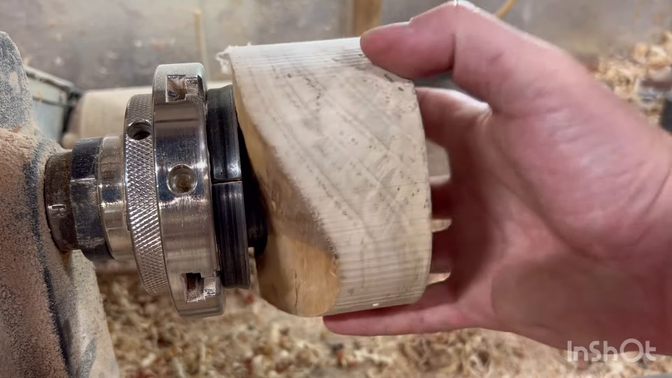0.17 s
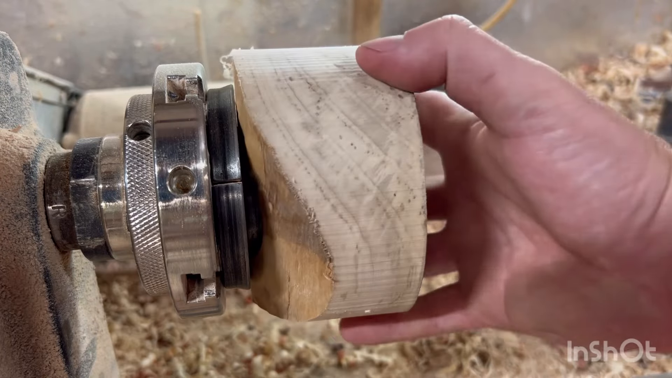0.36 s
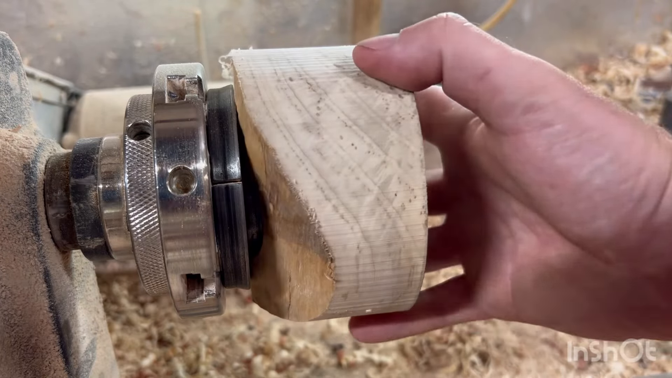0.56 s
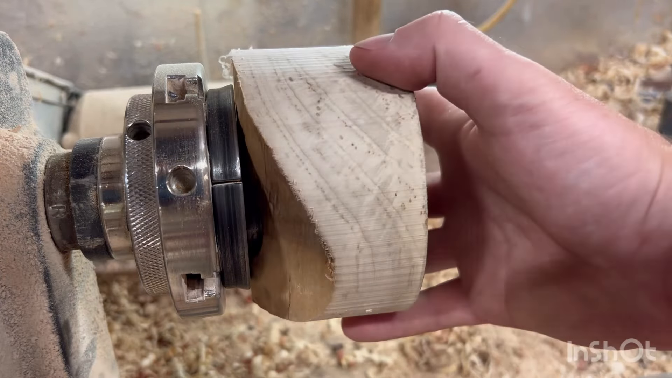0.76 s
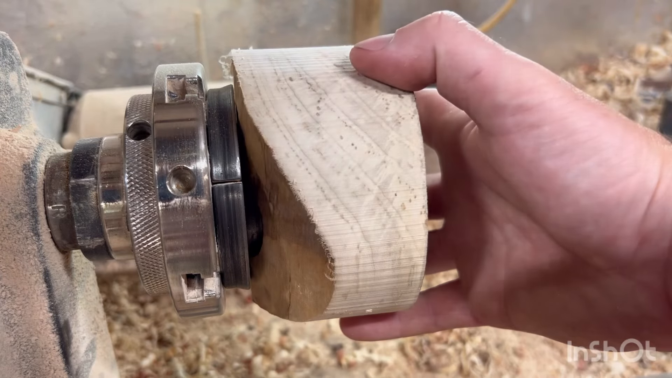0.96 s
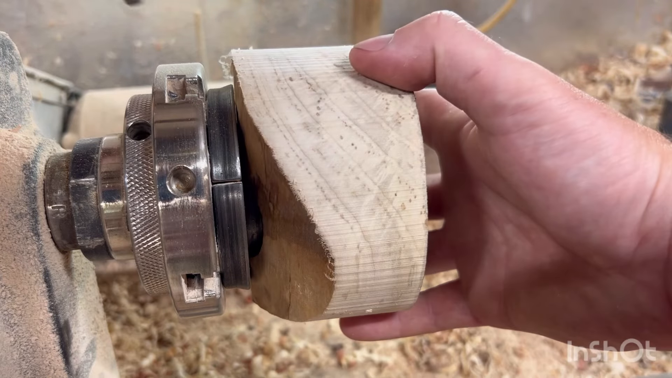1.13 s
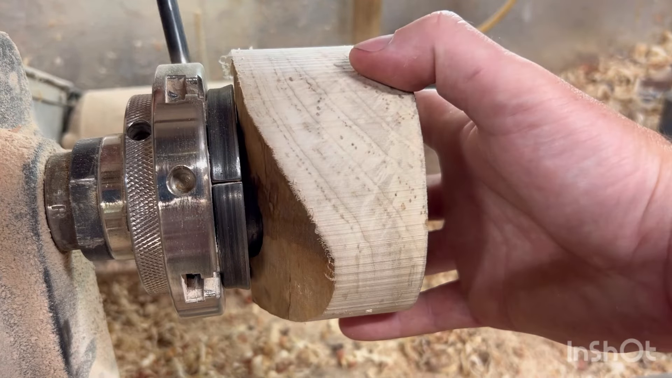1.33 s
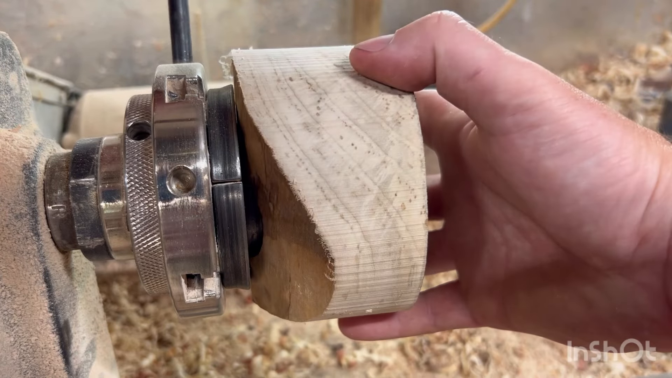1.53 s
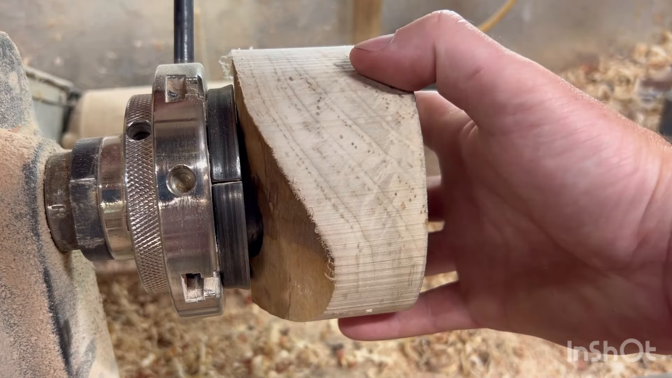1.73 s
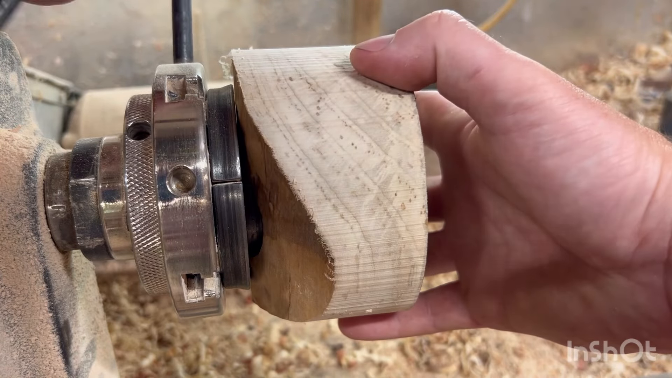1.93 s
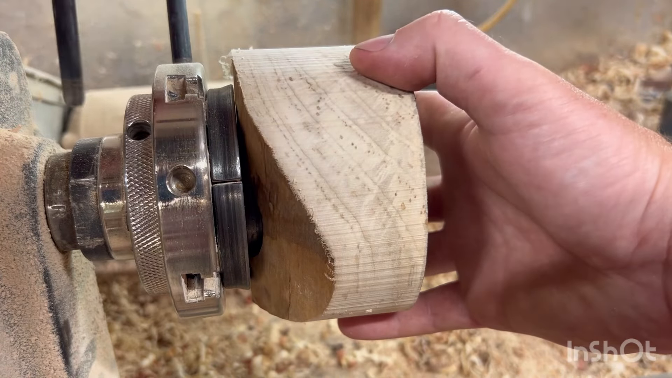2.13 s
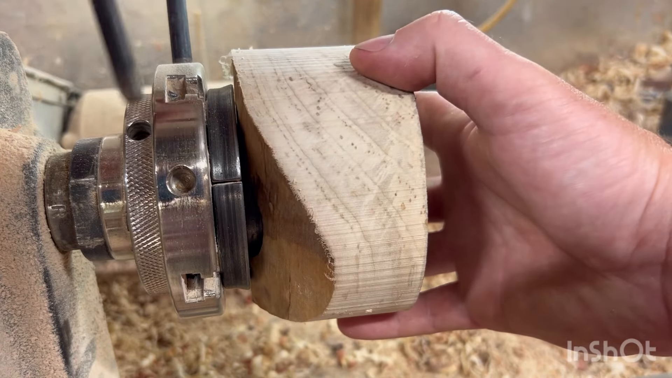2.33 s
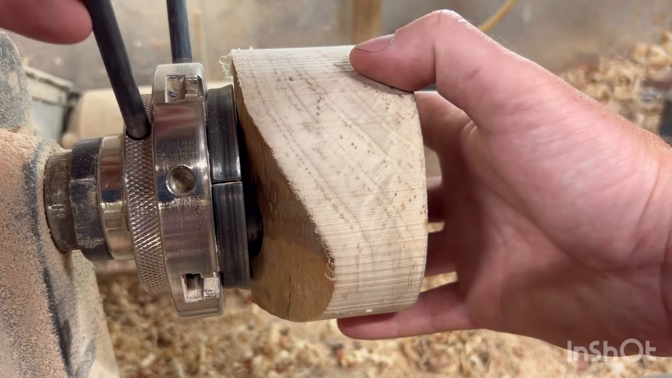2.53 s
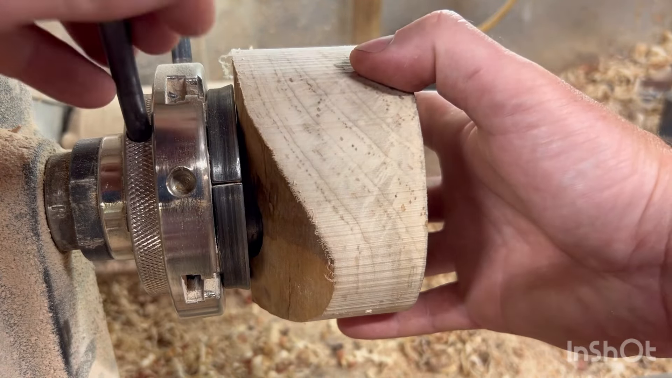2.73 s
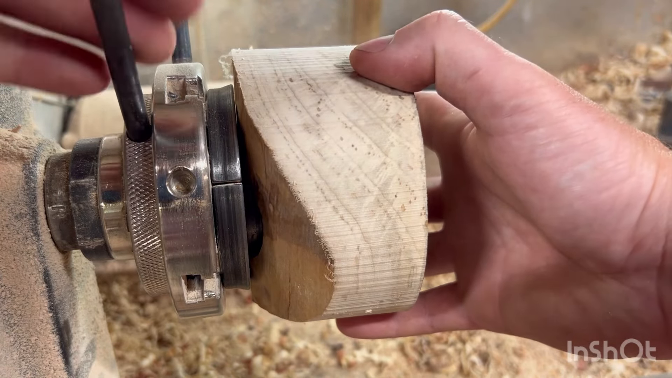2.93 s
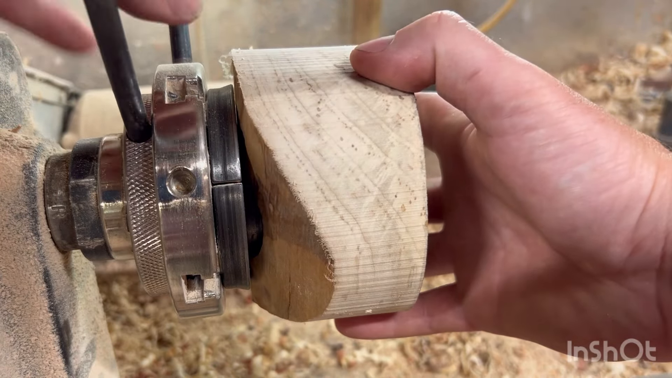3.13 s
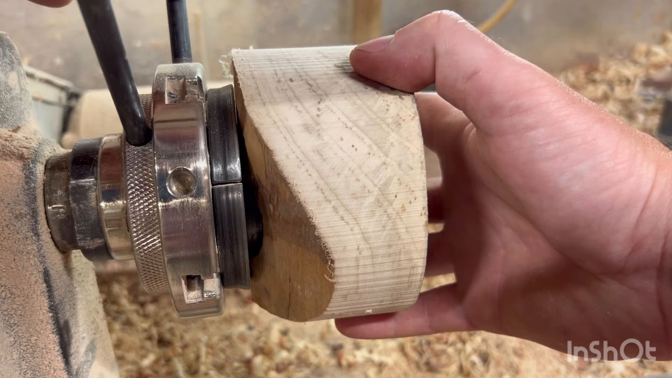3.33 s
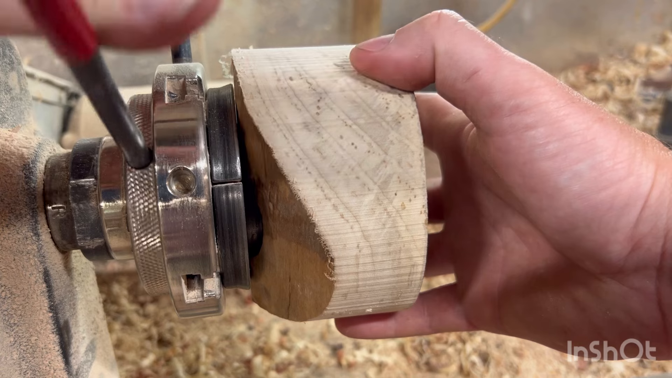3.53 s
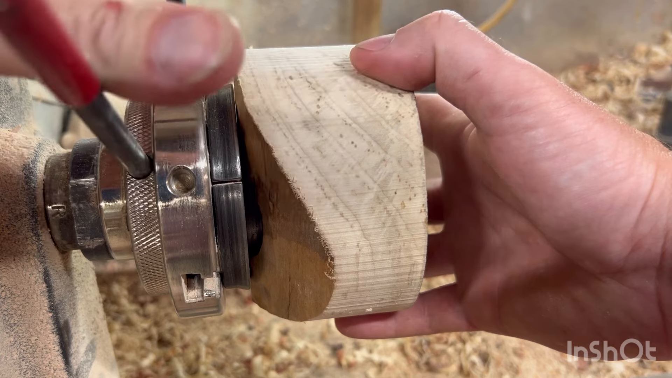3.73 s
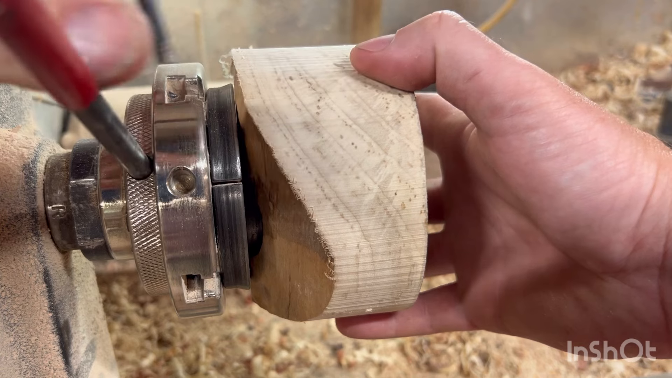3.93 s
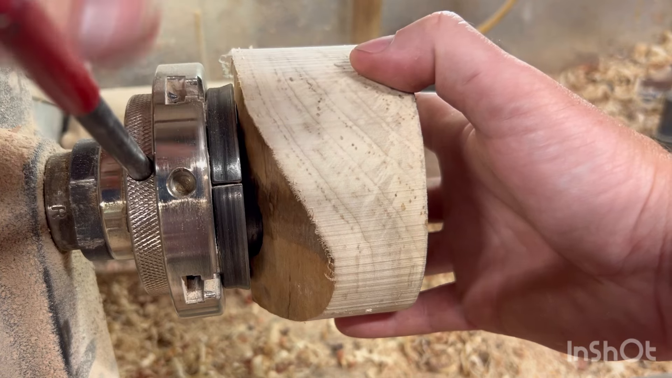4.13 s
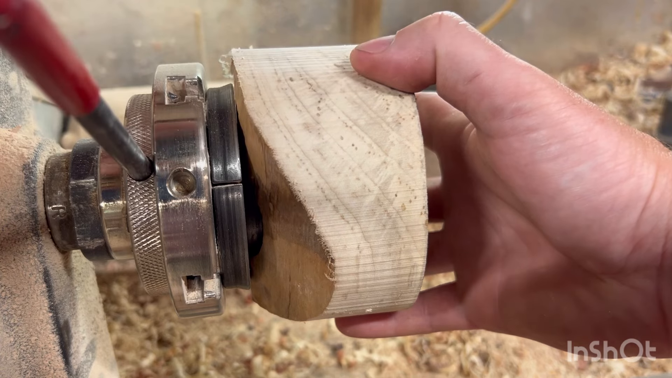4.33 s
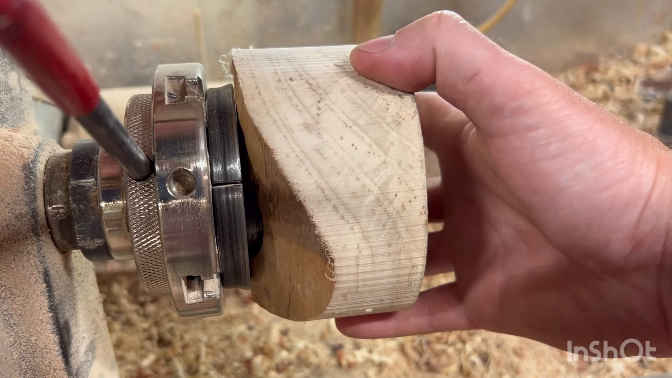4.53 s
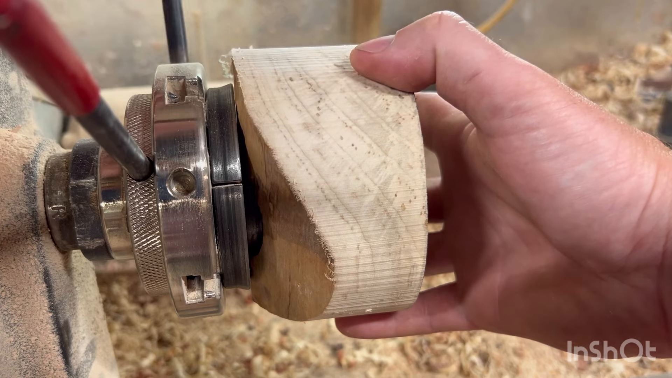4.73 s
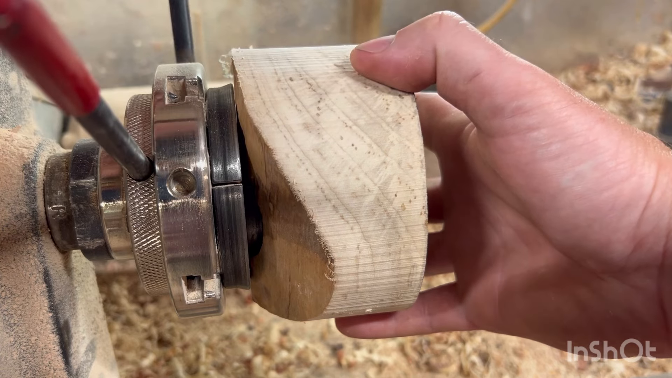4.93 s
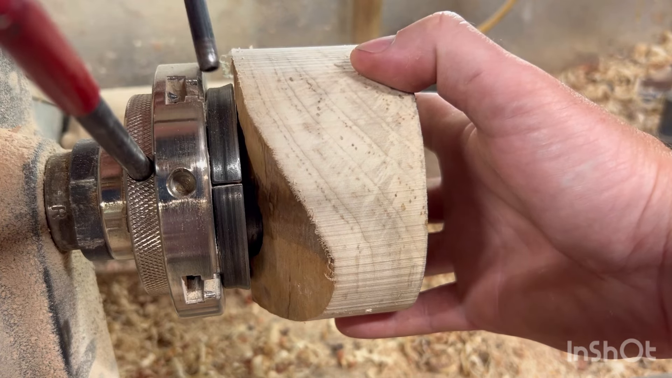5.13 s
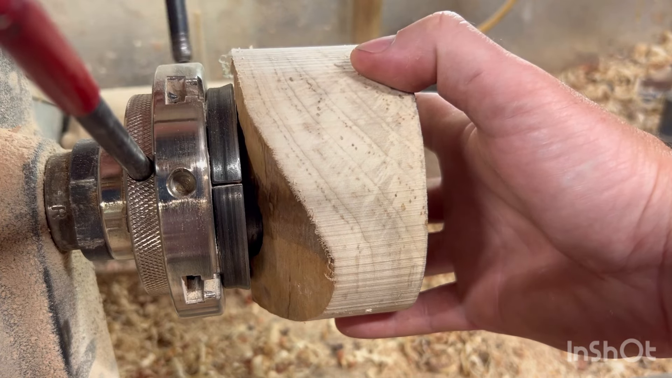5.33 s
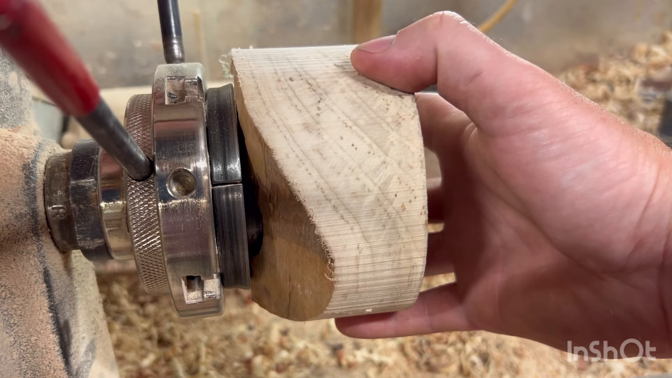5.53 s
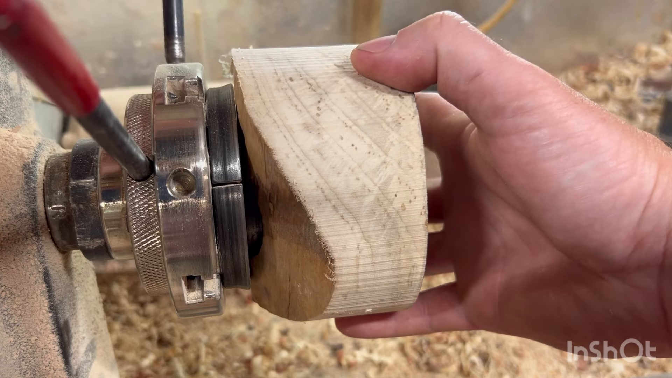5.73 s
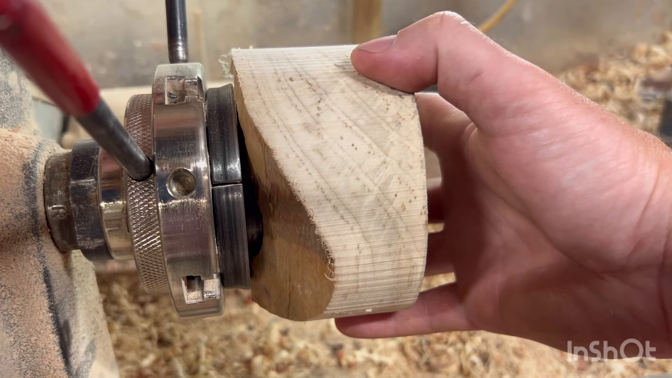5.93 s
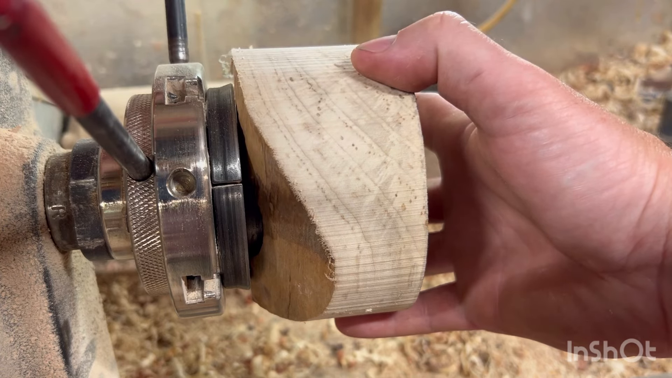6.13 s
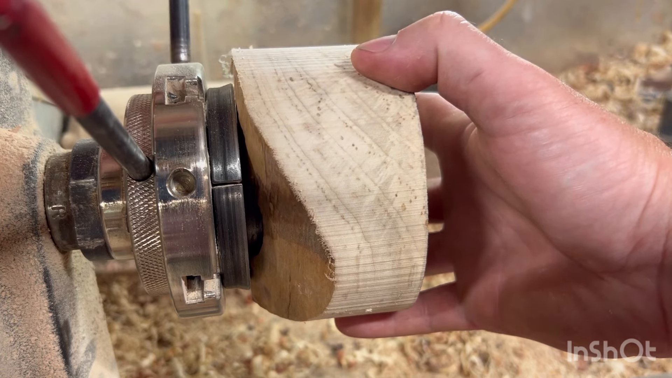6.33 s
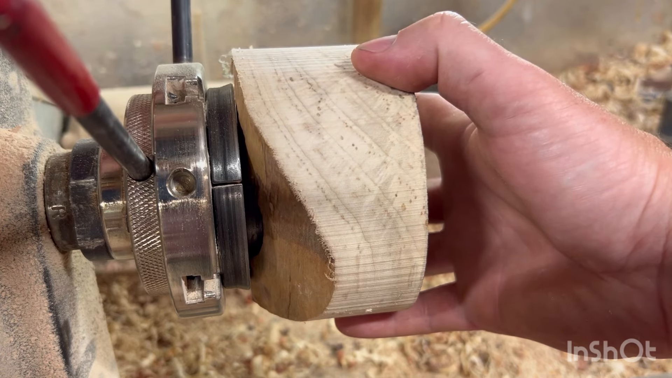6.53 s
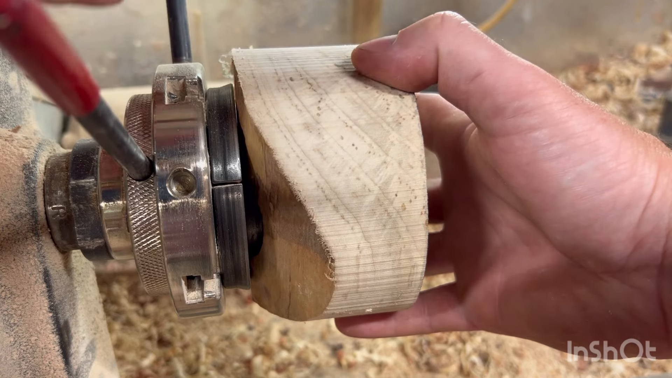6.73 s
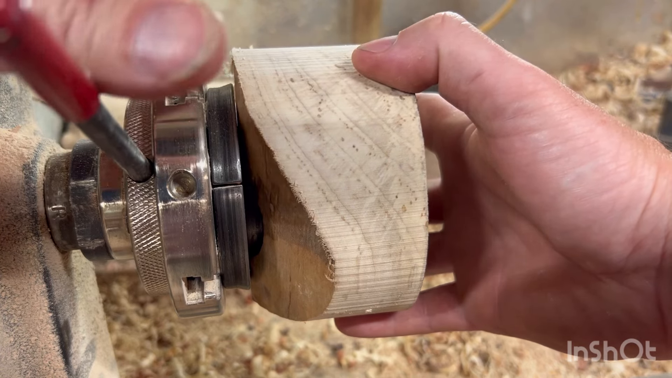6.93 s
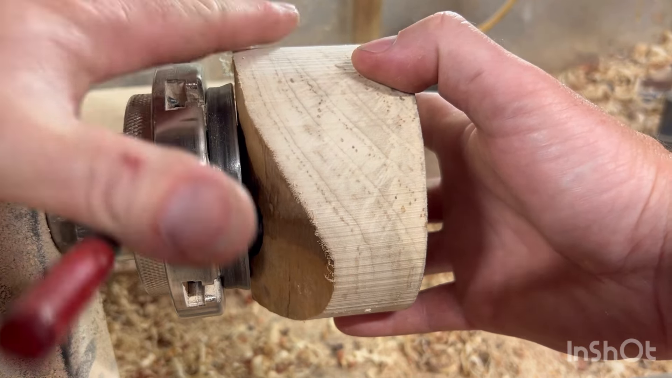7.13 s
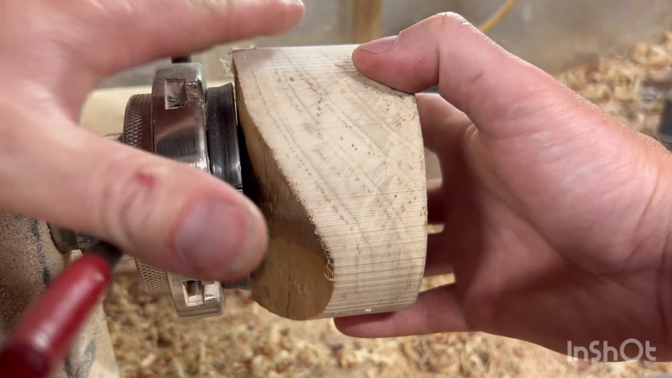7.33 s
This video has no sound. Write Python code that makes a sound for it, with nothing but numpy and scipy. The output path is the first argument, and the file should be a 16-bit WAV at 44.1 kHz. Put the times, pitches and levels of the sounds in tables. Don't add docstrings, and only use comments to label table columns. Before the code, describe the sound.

A close, dry stereo view of a small workshop, with a very quiet low hum and a far drone swelling slightly around 1.2 to 2 seconds. At the start a wooden blank slides on steel; at 0.1 and 0.16 it hits the chuck with two loud, short woody knocks and low thuds, then settles with a soft rap at 0.3. Around 1.33 to 1.4 a steel bar taps rapidly at a hole. At 1.93 it gives a small free ring. Clicks at 2.44 and 2.53 seat and jam it, and a hard bright clack at 2.68 drives it home. A dull nudge comes at 3.28. Near 3.9 there is a light scrape and thin squeal; at 4.7 a poke with the strongest high squeak, then fainter pokes and squeaks until 5.4. At 6.35 to 6.45 the bar slips in with a crisp rattle, followed by barely audible nudges and soft rubbing near 7.

```python
import sys
import numpy as np
from scipy import signal
from scipy.fft import rfft, irfft, next_fast_len
from scipy.io import wavfile
from scipy.ndimage import uniform_filter1d

SR = 44100
rng = np.random.default_rng(int(sys.argv[2]) if len(sys.argv) > 2 else 0)


def int16_out(signal):
    q = np.round(np.clip(np.atleast_2d(signal).T, -1, 1) * 32767)
    wavfile.write(sys.argv[1], SR, q.astype(np.int16))


def volts_from_db(level):
    exponent = np.asarray(level, float) / 20
    return 10 ** exponent


N = 325899

# Hz, dB per Hz.
HUM = [(12, -49), (20, -13.5), (64, 13.5), (139, -30), (179, -15.5), (265, -20), (416, -22.5), (599, -22),
       (939, -5), (1600, -15.5), (2050, -23.5), (2580, -37.5), (4500, -41), (6350, -36.5), (7250, -50.5),
       (8500, -43), (13100, -54), (13550, -36), (14100, -57.5)]
# Hz, likeness from 0 to 1.
HUM_LIKENESS = [(60, 0.98), (200, 0.95), (550, 0.52), (1000, 1), (2000, 0.25), (4000, 0.12)]
# Hz, left minus right in dB.
HUM_LEAN = [(60, -0.5), (240, -0.5), (950, -3.5), (3770, -12.5), (15000, 7.5)]
HUM_DB, HUM_LEAD_S = -62, .00022
# peak, rise and fall in seconds, level in dB.
DRONE = [(1.2, 0.7, 0.42, -66), (1.55, 0.39, 0.34, -62.5), (2.1, 0.29, 0.39, -69), (4.5, 1.26, 0.5, -68)]
# peak, rise and fall in seconds, level in dB.
WHINE = [(5.65, 0.4, 0.43, -95.5)]
WHINE_HZ, SQUEAL_HZ = 6460, 4962

# Hz, time to die by 60 dB in seconds.
SHOP_T60 = [(100, 0.71), (500, 0.36), (2000, 0.27), (5000, 0.25), (15000, 0.35)]
# Hz, room against direct sound in dB.
SHOP_WET = [(100, 5), (500, -8.5), (2000, -12), (5000, -22), (15000, -34)]
# Hz, lead of the left in radians.
PORT_LEAD = [(60, 0.), (300, .8), (600, .4), (1200, 1.3), (2500, -.6), (4900, -1.7), (9500, -.4),
             (15500, -.9)]
# Hz, left minus right in dB.
PORT_LEAN = [(60, -0.5), (130, -1.5), (290, -3), (640, 0.5), (1410, -2.5), (3100, 0), (4950, -3),
             (6820, -1), (15000, 0)]
# Hz,
# level in dB.
NEAR_COLOUR = [(5500, -1.5), (6500, 1), (7150, -22), (7700, 1.5), (10300, -2.5), (11200, -12), (13000, -21),
               (14500, -11), (15300, -1.5), (16300, -6), (17200, -58.5)]

# peak, rise and fall in seconds, rumble dB, bump dB.
PUSHES = [(0, 0.0097, 0.19, -39.5, -39), (.115, 0.014, 0.2, -31.5, -41), (.15, 0.014, 0.081, -34, -32),
          (.175, 0.027, 0.33, -37.5, -33.5), (.306, 0.0031, 0.037, -29.5, -73),
          (.44, 0.33, 0.096, -65, -55), (2.66, 0.19, 0.02, -45.5, -67.5), (2.95, 0.18, 0.24, -68, -64.5),
          (3.17, 0.12, .1, -60, -51), (3.94, 0.029, 0.12, -69.5, -54), (4.14, 0.078, 0.11, -79.5, -58.5),
          (4.79, 0.23, 0.059, -56, -85), (5.09, 0.0065, 0.096, -51, -75), (6.38, 0.013, 0.13, -77, -54.5),
          (6.468, 0.051, 0.17, -50, -59.5), (6.7, 0.027, 0.068, -75, -57), (7.0, 0.074, 0.6, -66.5, -68)]
# peak, rise and fall in seconds, swish dB.
BRUSHES = [(0, 0.0093, 0.35, -83), (2.03, 0.18, .1, -80), (3.47, 0.055, 0.13, -85),
           (.116, 0.0035, 0.05, -61.5), (.18, 0.03, 0.37, -68), (.438, 0.06, 0.13, -64.5),
           (2.96, 0.06, 0.12, -82), (3.18, 0.15, 0.083, -84.5), (5.576, 0.099, 0.093, -87),
           (6.37, 0.012, 0.25, -68), (7.086, 0.14, 0.17, -76.5), (7.39, 0.22, 0.092, -90)]
# peak, rise and fall in seconds, level in dB.
RUBS = [
    (0, .01, 0.7, -61.5),
    (.2, 0.035, 0.35, -60),
    (1.333, 0.017, 0.0048, -61.5),
    (7.07, .1, 0.085, -81.5),
]
# Hz, dB per Hz.
SWISH = [(410, -43), (700, -25), (1100, -2), (2130, -6.5), (6600, -11.5), (7200, -32), (7800, -10.5),
         (11400, -13), (12200, -49), (13800, -40), (14800, -16), (16500, -43.5)]
# peak, rise and fall in seconds, scrape dB, bar singing dB.
STROKES = [(2.436, 0.0067, 0.011, -57.5, -84), (2.668, 0.024, 0.008, -45.5, -57.5),
           (3.886, 0.075, 0.039, -54, -66), (4.72, 0.015, 0.073, -50.5, -68.5), (4.9, 0.03, 0.2, -67, -77),
           (5.1, 0.017, 0.14, -64, -72), (5.178, 0.052, 0.043, -72, -70), (5.22, 0.013, 0.024, -67, -70),
           (6.362, 0.022, 0.014, -49, -69), (6.44, 0.11, 0.053, -64, -82.5)]
# Hz, dB per Hz.
SCRAPE = [(410, -39), (700, 13), (1490, -18), (3240, 4), (4400, -15), (5090, -2), (8080, -25.5),
          (9720, -4.5), (12000, -58), (15900, -24.5), (16500, -54.5)]
# Hz, level in dB, time to die by 60 dB in seconds.
SLIDE_TONES = [(9560, 0, .06), (15400, -4, .06)]
# peak, rise and fall in seconds, level in dB.
SQUEAL = [(3.895, 0.0089, 0.12, -51), (4.08, 0.071, 0.11, -67.5), (4.706, 0.0089, 0.087, -36.5),
          (4.82, 0.012, 0.02, -66), (4.9, 0.038, 0.049, -79), (5.0, 0.082, 0.18, -54.5),
          (5.085, 0.0052, 0.013, -51), (5.135, 0.023, 0.045, -58), (5.22, .15, 0.12, -71)]
SWING_DB = 30
# start in seconds, level in dB.
TICKS = [(1.337, -39), (1.3409, -42), (1.3513, -41), (1.3691, -40), (1.3771, -44), (3.8669, -54),
         (3.873, -55), (3.8776, -55), (3.8804, -50), (3.8849, -51), (3.8919, -45), (3.8999, -48),
         (4.7221, -54), (4.7261, -54), (4.7688, -59), (4.7826, -60), (4.8028, -60), (4.8054, -55),
         (4.8966, -65), (4.947, -65), (5.0875, -51), (5.1276, -58), (5.1317, -56), (5.1356, -58),
         (5.1617, -58), (5.1651, -56), (5.1728, -51), (5.1947, -60), (5.2209, -52), (6.3548, -30),
         (6.3574, -43), (6.3614, -42), (6.375, -45), (6.3967, -33), (6.3992, -46), (6.4023, -51),
         (6.408, -42), (6.4137, -45), (6.4169, -49), (6.4229, -50), (6.4285, -39), (6.4312, -45),
         (6.4344, -46), (6.4467, -40)]
TICK_HZ, TICK_T60_S, TICK_DB = 3270, .008, 2.5

# start in seconds, dB of crack, thud, low ring (5 kHz) and high (9.5 kHz).
BUMPS = [
    (0, -44, -44, -58, -70),
    (0.1116, -13, -25.5, -29, -21.5),
    (0.1142, -21.5, -38.5, -33, -35.5),
]
# start in seconds, then dB of crack, thud, low ring and high ring.
KNOCKS = [
    (0.1571, -8, -20.5, -26, -36),
    (0.1596, -20, -34.5, -28, -48),
    (0.2041, -38.5, -41, -44.5, -74.5),
]
# start in seconds, then dB of crack, thud, low ring and high ring.
NUDGES = [
    (0.3035, -24, -33.5, -44.5, -54),
    (3.2793, -34.5, -45, -61, -61.5),
    (6.4472, -45, -68, -58, -64),
    (6.9570, -66.5, -57.5, -78, -87),
    (7.0372, -61, -57, -78, -90),
]
# start in seconds, then dB of crack, thud, low ring and high ring.
TAPS = [(1.3342, -27, -39, -40, -31), (1.3432, -26, -39, -35, -48), (1.3480, -31, -42, -40, -39),
        (1.3688, -36, -43, -45, -54), (1.3735, -36, -43, -47, -48), (1.3775, -38, -50, -47, -54),
        (1.3938, -46, -44, -53, -55)]
# start in seconds, then dB of crack, thud, low ring and high ring.
DANGLE = [
    (1.9317, -29, -50, -50.5, -32),
]
# start in seconds, then dB of crack, thud, low ring and high ring.
SEATS = [
    (2.4372, -40, -60, -64, -55),
    (2.4405, -23.5, -41.5, -50.5, -48),
    (2.4425, -17.5, -40.5, -52, -35),
]
# start in seconds, then dB of crack, thud, low ring and high ring.
JAMS = [
    (2.5300, -27, -48.5, -43, -27),
    (2.5327, -28, -41.5, -41, -24),
    (2.5390, -36, -55, -43, -30.5),
]
# start in seconds, then dB of crack, thud, low ring and high ring.
HOME = [
    (2.6753, -17.5, -29.5, -33.5, -20.5),
    (2.6775, -32.5, -39, -33, -34.5),
]
# start in seconds, then dB of crack, thud, low ring and high ring.
PROBES = [(3.8881, -39.5, -50, -53.5, -53), (3.8974, -47, -54.5, -58, -64), (4.8046, -49, -48.5, -65, -72),
          (5.0789, -38, -48, -47, -45), (5.1275, -56, -53, -61, -63), (5.1728, -52.5, -58, -68, -70),
          (5.2209, -59, -63, -70, -68), (5.3613, -39.5, -45, -64.5, -70.5), (5.7700, -59.5, -55, -74, -81)]
# start in seconds, then dB of crack, thud, low ring and high ring.
POKES = [
    (4.6982, -29.5, -36.5, -55, -51),
    (4.9766, -33.5, -41.5, -54, -65),
]
# start in seconds, then dB of crack, thud, low ring and high ring.
SLIPS = [(6.3548, -36, -47.5, -52, -38), (6.3580, -60, -60, -56, -34), (6.3635, -58, -60, -56, -34.5),
         (6.3752, -54, -46, -56, -42), (6.3967, -40, -54, -60, -40), (6.4082, -50, -49.5, -58, -56),
         (6.4137, -60, -65, -60, -54), (6.4285, -46, -62, -58, -46), (6.4470, -42, -43, -56, -70)]

# Hz, dB per Hz.
WOOD = [(350, -22.5), (600, -4), (1150, -14.5), (1720, -12.5), (2370, -12.5), (4800, -13.5), (6890, -24.5),
        (7590, -15), (12900, -55), (15400, -35), (16500, -68.5)]
# Hz, dB per Hz.
DULL = [(350, -47), (600, -5.5), (1680, -7), (2450, -3.5), (3070, -18), (3400, -15.5), (4940, -14),
        (7090, -61), (9000, -47), (11700, -78), (19800, -120)]
# Hz, dB per Hz.
TOUCH = [(350, -39), (600, 1.5), (1290, -14.5), (1770, -8), (3490, -4.5), (4940, -4.5), (7180, -20.5),
         (9610, -9.5), (12300, 2), (15800, -18), (16500, -56)]
# Hz, dB per Hz.
STEEL = [(350, -26), (600, -7), (1580, -21.5), (2370, -11), (2680, -10), (5080, -1.5), (7180, -28.5),
         (9480, -19), (12700, -34.5), (15200, -21.5), (16500, -30.5)]
# Hz, dB per Hz.
HOLE = [(350, -33), (600, 8.5), (1360, -7), (3260, -1), (4420, -9.5), (5080, -18), (7490, -16), (9480, -22),
        (12500, -109), (15800, -25), (16500, -15)]
# Hz, dB per Hz.
THUD = [(35, -39.5), (60, -16.5), (101, -9.5), (232, -15), (314, -1), (377, -7), (530, -2.5), (802, -19.5),
        (862, -18), (1100, -20.5), (1430, -44), (2420, -120)]
# Hz, level in dB, time to die by 60 dB in seconds.
BODY = [(112, -9.5, 1.4), (192, -15.5, 0.04), (284, -6.5, 0.35), (323.1, 7.5, 0.57), (437, 5.5, 0.71),
        (520, -2, 0.53), (697.6, -29, 0.13), (687, -16.5, 0.5), (960, -25, 2.3)]
# Hz, dB against its ring column, time to die by 60 dB in seconds.
RIM = [(1266, 3.5, .018), (857, -1, 0.029), (2580, -2, .03), (3560, -3.5, .016), (4724, -3, .025),
       (7700, -9.5, 0.019), (7960, -14.5, 0.014), (9100, -6.5, .01), (15300, -23.5, 0.01)]
# Hz, dB against its ring column, time to die by 60 dB in seconds.
BLANK = [(1117, 6.5, .02), (824, -5.5, .025), (1960, -9, 0.03447), (2735, -11.5, .03), (3814, -6, 0.012),
         (4734, -12, .025), (7660, -10, 0.03), (9283, -13, 0.019)]
# Hz, dB against its ring column, time to die by 60 dB in seconds.
RAPPED = [(2360, -17, 0.0092), (1480, -9, 0.084), (756, -1.5, 0.048)]
# Hz, dB against its ring column, time to die by 60 dB in seconds.
DAMPED = [(1830, -5, 0.03), (4920, -1, 0.035), (4260, -4, 0.016), (9555, -8, 0.09), (15370, -14, .04),
          (3900, -8, 0.018)]
# Hz, dB against its ring column, time to die by 60 dB in seconds.
HANGING = [(1845, -2, .55), (5000, 5, .15), (9580, -3, .07), (15410, -18, .07), (2330, 0, .04),
           (2050, -1, .04)]
# Hz, dB against its ring column, time to die by 60 dB in seconds.
GRIPPED = [(2331, -6.5, 0.038), (4960, -2.5, 0.023), (9730, -10.5, 0.028), (15430, -9, 0.023),
           (8220, -7, .035)]
# Hz, dB against its ring column, time to die by 60 dB in seconds.
JAMMED = [(1800, -4, 0.02), (5180, -3, 0.05), (3750, -6, .015), (9572, 0, 0.046), (15400, -15, 0.045),
          (8118, -17, .035)]
# Hz, dB against its ring column, time to die by 60 dB in seconds.
LOCKED = [(533, -2, 0.039), (1015.4, -7.5, 0.051), (1421, -8, 0.054), (1870, 0, 0.034), (2270, -0.5, 0.045),
          (2425, -5.5, .03), (4280, -11.5, 0.019), (4860, -1, .03), (8000, -16.5, 0.031),
          (9623, 0.5, 0.015), (11400, -11.5, 0.014), (15400, 5, 0.016)]
# Hz, dB against its ring column, time to die by 60 dB in seconds.
LOOSE = [(1820, -9, .025), (2520, -18, 0.017), (4840, 3, 0.078), (9545, -2, 0.067), (15390, -22, 0.082),
         (3400, 5, 0.025)]
# Hz, dB against its ring column, time to die by 60 dB in seconds.
FLAT = [(1950, 0.5, 0.077), (2364, -13, 0.043), (2939, 6, 0.049), (4091, -3, .03), (6185, -9, 0.018),
        (9500, 1.5, 0.058), (15370, -2, 0.072)]
# Hz, dB against its ring column, time to die by 60 dB in seconds.
WEDGED = [(1795, -9.5, 0.04), (4940, -5, 0.03), (9550, 0, 0.05), (15400, -24, 0.06), (8440, -22, 0.03)]
# low Hz, high Hz, dB against the ring column,
# time to die by 60 dB in seconds.
WASH = [(4850, 5400, -21, .32), (1700, 2700, -22, .25), (7750, 8500, -36, .28), (8500, 9200, -43, .25),
        (9350, 9950, -34, .3), (15200, 15550, -44, .3)]


def evened(x):
    return x / np.sqrt(np.mean(x ** 2) + 1e-20)


def read(points, hz):
    f, value = np.transpose(points)
    return np.interp(np.log(hz + 1), np.log(f + 1), value)


def add(mix, s, sound):
    part = mix[round(s * SR):][:len(sound)]
    part += sound[:len(part)]


def coloured(x, points):
    hz = abs(np.fft.fftfreq(4096, 1 / SR))
    log_gain = np.log(volts_from_db(np.maximum(read(points, hz), -100)))
    taps = np.fft.ifft(np.exp(np.conj(signal.hilbert(log_gain)))).real[:1024]
    return signal.oaconvolve(x, taps / np.linalg.norm(taps))[:len(x)]


def band(x, low_hz, high_hz):
    sos = signal.butter(2, [low_hz, high_hz], "band", fs=SR, output="sos")
    return evened(signal.sosfilt(sos, x))


def ring(hz, db, t60, t, phase=0.):
    return volts_from_db(db - 60 * t / t60) * np.sin(2 * np.pi * hz * t + phase)


def resonate(x, hz, t60):
    r = np.exp(-np.log(1000) / (t60 * SR))
    return evened(signal.lfilter([1], [1, -2 * r * np.cos(2 * np.pi * hz / SR), r * r], x))


def gesture(rows, x, column=3, bend=1):
    t, gain = np.arange(0, N + 32, 32) / SR, 0
    for row in rows:
        peak, rise, fall = row[:3]
        away = np.where(t < peak, (peak - t) / rise, (t - peak) / fall)
        gain = gain + volts_from_db(row[column] - SWING_DB * np.minimum(away, 5) ** bend)
    return np.interp(np.arange(N) / SR, t, gain) * x


def hum():
    frames, hz = N // 256 + 5, np.fft.rfftfreq(1024, 1 / SR)
    a, b, c, d, patches = rng.standard_normal((frames, 513, 5)).T
    patches = evened(uniform_filter1d(uniform_filter1d(patches, 8, 0), 20, 1))
    same = np.clip(read(HUM_LIKENESS, hz), -1, 1)[:, None]
    left = a + 1j * b
    right = same * left + np.sqrt(1 - same ** 2) * (c + 1j * d)
    z = np.array([left, right])
    z[0] *= np.exp(2j * np.pi * hz * HUM_LEAD_S)[:, None]
    lean = np.array([.5, -.5])[:, None, None] * read(HUM_LEAN, hz)[:, None]
    z *= volts_from_db(read(HUM, hz)[:, None] + lean + 1.6 * patches)
    return volts_from_db(HUM_DB) * evened(signal.istft(z, nperseg=1024, noverlap=768)[1][:, :N])


def far():
    shared, left, right = rng.standard_normal((3, N))
    drone = np.array([band(shared + 2.0 * own, 150.0, 440) for own in (left, right)])
    whine = resonate(shared, WHINE_HZ, 0.45)
    return gesture(DRONE, drone, bend=1.8) + gesture(WHINE, whine, bend=5.4)


def shop(x):
    taps = np.zeros((3, SR))
    at = np.arange(200, SR - 20, 20) + rng.integers(0, 20, (3, (SR - 201) // 20))
    np.put_along_axis(taps, at, rng.choice([-1., 1.], at.shape), 1)
    taps = taps[0] + 0.58 * taps[1:]
    hz, t, z = signal.stft(taps, SR, nperseg=512)
    t60 = read(SHOP_T60, hz)[:, None]
    fade = volts_from_db(read(SHOP_WET, hz)[:, None] - 60 * t / t60) / np.sqrt(t60 * 200)
    tail = signal.istft(z * fade, SR, nperseg=512)[1]
    return signal.fftconvolve(x[None], tail, axes=1)[:, :N]


def ports(x):
    size = next_fast_len(N + 4096)
    hz, side = np.fft.rfftfreq(size, 1 / SR), np.array([[.5], [-.5]])
    turn = volts_from_db(side * read(PORT_LEAN, hz)) * np.exp(1j * side * read(PORT_LEAD, hz))
    return irfft(rfft(x, size) * turn, size)[:, :N]


def rumble():
    push = rng.standard_normal(N)
    return evened(sum(volts_from_db(db) * resonate(push, f, 0.027) for f, db, _ in BODY))


def handling():
    swish, push = rng.standard_normal((2, N))
    bench = resonate(push, BODY[0][0], .25)
    bump = evened(band(band(push, 60, 150), 50, 170) + .8 * bench)
    pushed = gesture(PUSHES, rumble()) + gesture(PUSHES, bump, column=4)
    rubbed = gesture(RUBS, band(band(swish, 900, 5800), 600, 6200))
    brushed = gesture(BRUSHES, volts_from_db(7.) * evened(coloured(swish, SWISH)))
    return pushed + rubbed + brushed


def sliding():
    bursts = np.minimum(rng.exponential(1, N // 64 + 1), 4)
    grit = rng.standard_normal(N) * volts_from_db(2.5 * bursts).repeat(64)[:N]
    song = sum(volts_from_db(db) * resonate(grit, f, t60) for f, db, t60 in SLIDE_TONES)
    scrape = evened(coloured(grit, SCRAPE))
    return gesture(STROKES, scrape) + gesture(STROKES, song, column=4)


def squeal():
    waver = 2.4 * evened(uniform_filter1d(rng.standard_normal(N), 2000))
    tone = np.sqrt(2) * np.sin(2 * np.pi * np.cumsum(SQUEAL_HZ + waver) / SR)
    return gesture(SQUEAL, tone, bend=2.06)


def ticks():
    out, t = np.zeros(N), np.arange(1024) / SR
    onset = 1 - np.exp(-t / 0.00023)
    for (s, db), e in zip(TICKS, rng.standard_normal(len(TICKS))):
        add(out, s, ring(TICK_HZ * (1 + 0.092 * e), db + TICK_DB, TICK_T60_S, t) * onset)
    return out


def contacts(events, colour, bar, crack_t60, thud_db, treble_db, spot_hz, spot_db,
             free_s=1., blur=0.63, steel_db=0., stop_s=.004):
    out, t = np.zeros(N), np.arange(SR // 3) / SR
    hiss = rng.standard_normal(len(t))
    wash = [volts_from_db(db - 60 * t / t60) * band(band(hiss, low, high), low, high) for low, high, db, t60 in WASH]
    next_starts = [row[0] for row in events[1:]] + [N]
    for (s, crack_db, body_db, low_db, high_db), next_s in zip(events, next_starts):
        chatter = rng.standard_normal((2, len(t)))
        fade = volts_from_db(-60 * t / crack_t60) + 1.6 * volts_from_db(-60 * t / .006)
        rattle = coloured(chatter[0] * fade, colour)
        dull, bright = band(rattle, 700, 6800), band(rattle, 7500, 22000)
        crack = dull / abs(dull).max() + ring(spot_hz, spot_db, .012, t)
        bright *= volts_from_db(-60 * t / 0.062)
        fizz = bright / abs(bright).max()

        spread = rng.standard_normal(len(BODY))
        body = sum(ring(f, db + 4. * e, .5 * min(t60, .5), t) for (f, db, t60), e in zip(BODY, spread))
        shake = evened(coloured(chatter[1], THUD)) * volts_from_db(-60 * t / 0.14)
        thud = (shake + 0.11 * body) * (1 - np.exp(-t / 0.0072))

        shiver = evened(uniform_filter1d(chatter[1], size=70))
        sing = np.zeros(len(t))
        for f, db, t60 in bar:
            drive = low_db if f < 6000 else high_db
            tone = ring(f, db + drive, t60, t, 2 * np.pi * f * s)
            sing += tone * (1 + blur * np.roll(shiver, int(f)))
        sing *= np.exp(-np.maximum(t - min(next_s - s, free_s), 0) / stop_s)
        sing += volts_from_db(low_db) * sum(wash[:2]) + volts_from_db(high_db + steel_db) * sum(wash[2:])
        sing *= 1 - np.exp(-t / 0.0002)

        touch = volts_from_db(crack_db - 1.5) * crack + volts_from_db(high_db + treble_db) * fizz
        touch += volts_from_db(body_db + thud_db) * thud + volts_from_db(4.) * sing
        add(out, s, touch)
    return out


def scene():
    near = contacts(BUMPS, WOOD, RIM, crack_t60=0.03, thud_db=-12.0, treble_db=-9.,
                    spot_hz=1180, spot_db=-9, blur=.35, steel_db=-14.)
    near += contacts(KNOCKS, WOOD, BLANK, crack_t60=0.037, thud_db=-7.5, treble_db=-9.5,
                     spot_hz=1160, spot_db=-12, blur=.3)
    near += contacts(NUDGES, DULL, RAPPED, crack_t60=0.043, thud_db=-2.5, treble_db=16.0,
                     spot_hz=2300, spot_db=0.0, blur=.3)
    near += contacts(TAPS, TOUCH, DAMPED, crack_t60=0.03, thud_db=-2., treble_db=2.,
                     spot_hz=2900, spot_db=-10, blur=.35)
    near += contacts(DANGLE, TOUCH, HANGING, crack_t60=0.11, thud_db=4.0, treble_db=-13.0,
                     spot_hz=2690, spot_db=-19.0, free_s=0.226, blur=0.3, stop_s=0.023)
    near += contacts(SEATS, STEEL, GRIPPED, crack_t60=0.034, thud_db=2.5, treble_db=18.0,
                     spot_hz=1840, spot_db=-13, blur=0.49)
    near += contacts(JAMS, STEEL, JAMMED, crack_t60=0.064, thud_db=3.0, treble_db=-8.0,
                     spot_hz=3640, spot_db=-6.5, blur=0.3)
    near += contacts(HOME, STEEL, LOCKED, crack_t60=0.03, thud_db=1.5, treble_db=-4.,
                     spot_hz=1880, spot_db=-12, blur=0.25)
    near += contacts(PROBES, HOLE, LOOSE, crack_t60=0.052, thud_db=-2.5, treble_db=7.0,
                     spot_hz=3100, spot_db=-9, blur=0.083)
    near += contacts(POKES, HOLE, FLAT, crack_t60=0.068, thud_db=-1.0, treble_db=5.5,
                     spot_hz=3500, spot_db=-9, blur=0.18)
    near += contacts(SLIPS, HOLE, WEDGED, crack_t60=.014, thud_db=-5., treble_db=-14.,
                     spot_hz=3300, spot_db=-6, blur=.15)
    near = coloured(near + sliding() + ticks(), NEAR_COLOUR)
    return ports(near + handling() + squeal()) + shop(near) + hum() + far()


def roll_off(x):
    return signal.sosfilt(signal.butter(12, 17080, fs=SR, output="sos"), x)


def record(dry):
    bass_cut = signal.butter(4, 45, "high", fs=SR, output="sos")
    return roll_off(signal.sosfilt(bass_cut, dry))


dry = scene()
out = record(dry)
int16_out(out)
```